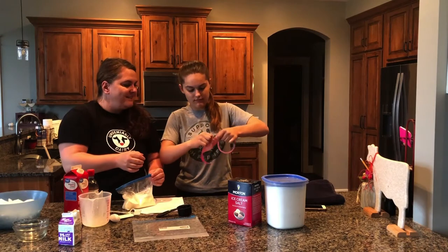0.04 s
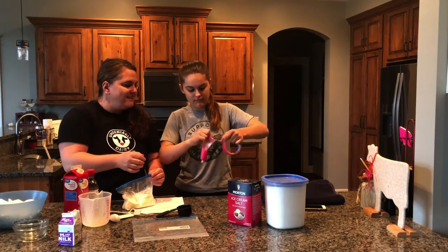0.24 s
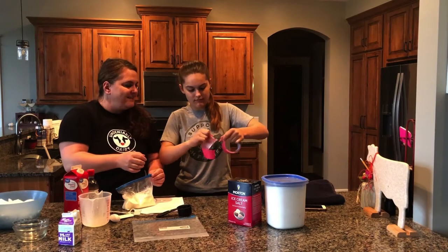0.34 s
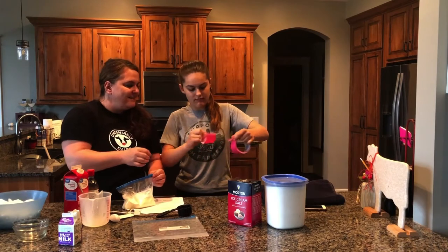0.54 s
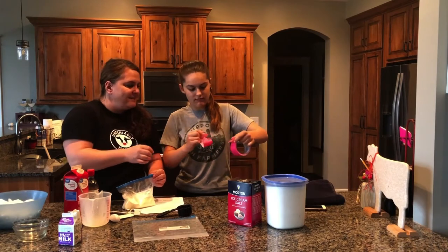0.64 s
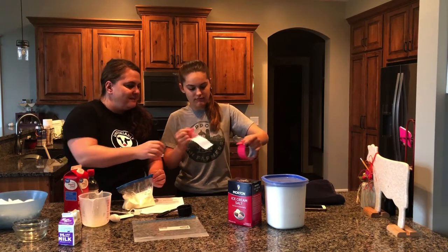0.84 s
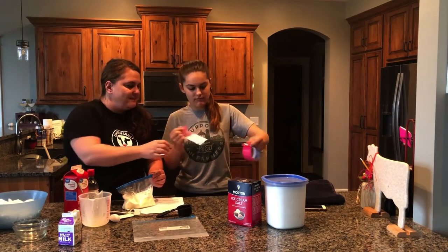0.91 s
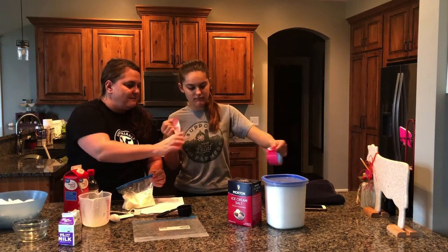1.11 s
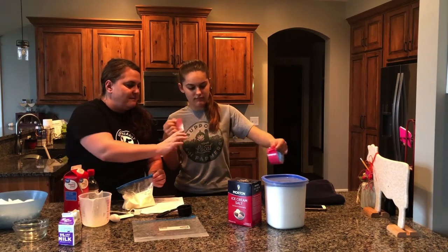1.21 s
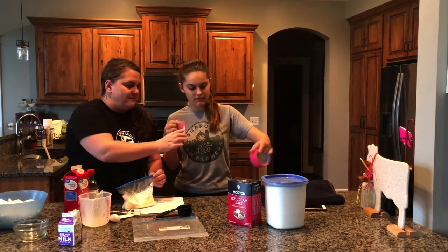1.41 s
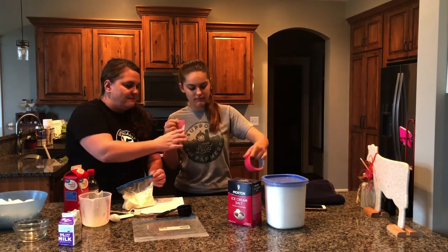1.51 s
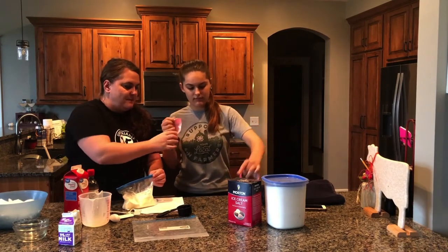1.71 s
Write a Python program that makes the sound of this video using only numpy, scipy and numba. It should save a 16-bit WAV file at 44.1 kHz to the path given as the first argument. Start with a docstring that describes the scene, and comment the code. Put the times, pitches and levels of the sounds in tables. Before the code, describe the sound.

One loud, very short tape rip with dull low knocks rings through a hard-surfaced kitchen, followed by light ticks, jerky rubbing and a last sticky click, heard from some distance over quiet room noise.

```python
"""A strip of duct tape is torn off its roll in a hard-surfaced kitchen, a few metres from the microphone.
The glue lets go in quick slips, each a spray of fibre breaks that rings the free strip. Low knocks begin
during the tear and go on after it; the strip crackles in short noise bursts, is rubbed in jerks of friction
grains, and a last patch of glue snaps free as one push and pull. Early echoes and a long noise tail are the
kitchen; under it lie room noise, wavering hum, faint tones that come and go and a motor note that sets in."""
import sys
import numpy as np
from scipy import signal
from scipy.fft import rfft, irfft
from scipy.io import wavfile
from scipy.ndimage import uniform_filter1d
from numba import njit

SR = 44100
rng = np.random.default_rng(int(sys.argv[2]) if len(sys.argv) > 2 else 0)


def dump_mix(stems):
    """Bounce the given channels to the path in sys.argv[1] as a 16-bit WAV at rate SR."""
    frames = np.atleast_2d(stems).T  # one column per channel
    limited = np.clip(frames, -1, 1)  # hard clip at full scale
    pcm = np.round(limited * 32767).astype(np.int16)
    wavfile.write(sys.argv[1], SR, pcm)


def voltage_ratio(level):
    """Linear amplitude factor for a level in decibels (scalar or array-like)."""
    return 10 ** (np.asarray(level, float) / 20)


N = 77175  # samples in the scene


def level(x, db):
    """Scale to an rms level."""
    return x * voltage_ratio(db) / np.sqrt(np.mean(x ** 2))


def on_log(table, hz):
    """Read a (Hz, value) table on a log-frequency axis."""
    table = np.array(table, float)
    return np.interp(np.log(hz + 1), np.log(table[:, 0]), table[:, 1])


def colour(x, table):
    """Filter by a (Hz, dB) spectrum."""
    hz = np.arange(len(x) // 2 + 1) * SR / len(x)
    return irfft(rfft(x) * voltage_ratio(on_log(table, hz)), len(x))


@njit
def svf(x, hz, width):
    """State-variable band-pass whose centre and width may move; gain 1 at the centre."""
    y, b, l = np.empty(len(x)), 0., 0.
    for i in range(len(x)):
        g, k = np.tan(np.pi * hz[i] / SR), width[i] / hz[i]
        v = (b + g * (x[i] - l)) / (1 + g * (g + k))
        b, l, y[i] = 2 * v - b, l + 2 * g * v, k * v
    return y


def band(x, hz, width_hz):
    """Band-pass for plain numbers or curves."""
    one = np.ones(len(x))
    return svf(x + 1e-18, np.clip(hz * one, 20, .44 * SR), width_hz * one)


def grains(shape, scatter_db):
    """Noise whose samples differ widely in size, like many tiny breaks."""
    return rng.standard_normal(shape) * voltage_ratio(scatter_db * np.minimum(rng.exponential(size=shape), 4))


def add(out, s, x):
    """Mix x into out at time s."""
    i = int(s * SR)
    out[i:i + len(x)] += x[:N - i]


def burst_rms(x, length):
    """Root of the burst's energy spread over its decay length in seconds."""
    return np.sqrt(np.sum(x ** 2) / (length * SR))


def walk(rate):
    """Random levels held 1 / rate s and slewed."""
    hold = int(SR / rate)
    steps = np.repeat(rng.standard_normal(N // hold + 1), hold)
    return uniform_filter1d(steps, hold)[:N]


def curve(rows):
    """Gain over time from (s, dB) rows, silent outside."""
    rows = np.array(rows, float)
    return voltage_ratio(np.interp(np.arange(N) / SR, rows[:, 0], rows[:, 1], left=-150, right=-150))


def floor():
    """Coloured room noise, sines of wavering hum, narrow-band noise tones and a steady motor sine."""
    # spectrum of the room noise: f/Hz, relative level/dB
    room_noise = [(15, -47), (25, -22), (48, -0.5), (90, -7), (177, -3.5), (321, -3), (368, -2), (568, -13),
                  (617, -10), (1510, -22), (1930, -19), (13600, -34.5), (16500, -40)]
    # appliance hum: f/Hz, rms level/dB before wavering
    hum_lines = [(59.5, -76), (120, -80.5), (181, -84), (362, -79.5)]
    # faint tones: from t/s, to t/s, level/dB, f/Hz, width/Hz
    faint_tones = [(0.014, 0.22, -73.5, 1480, 60), (.65, .85, -67, 1483, 57)]
    t = np.arange(N) / SR
    out = level(colour(rng.standard_normal(N), room_noise), -67)
    for hz, db in hum_lines:
        waver = voltage_ratio(db + 2.0 * walk(9.2))
        out += np.sqrt(2) * waver * np.sin(2 * np.pi * (hz * t + rng.random()))
    motor_from_s, motor_hz, motor_db = 1.0, 473.7, -76
    motor_fade = np.clip((t - motor_from_s) / .05, 0, 1)
    out += np.sqrt(2) * voltage_ratio(motor_db) * motor_fade * np.sin(2 * np.pi * motor_hz * t)
    for start, end, db, hz, width in faint_tones:
        fade = np.clip(np.minimum(t - start, end - t) / 0.011, 0, 1)
        out += fade * level(band(rng.standard_normal(N), hz, width), db)
    return out


def tear():
    """Each slip is a short spray of breaking fibres that rings the free strip."""
    # slips of the tear: t/s, relative level/dB, decay length/s, ring of the free strip f/Hz
    slips = [(0.199, -36, 0.0008, 3260), (0.1995, -31.5, 0.0013, 2440), (0.2037, -22.5, 0.00074, 2480),
             (0.2112, -17.5, 0.00083, 2580), (0.2138, -14, 0.001, 2360), (0.2169, -13, 0.00086, 2360),
             (0.2198, -18.5, 0.0013, 2830), (0.2241, -20.5, 0.00085, 3800), (0.2261, -18, 0.0011, 4000),
             (0.2307, -12, 0.00059, 4070), (0.233, -16, 0.00078, 4080), (0.2349, -20, 0.0009, 3800),
             (0.2382, -13.5, 0.0011, 3748), (0.2407, -18, 0.00054, 4330), (0.2431, -10, 0.00068, 5230),
             (0.2433, -12, 0.00045, 3900), (0.2462, -11.5, 0.0009, 4400), (0.248, -10, 0.001, 3310),
             (0.2504, -18.5, 0.0009, 3960), (0.2604, -15, 0.00082, 3380), (0.2616, -12, 0.00096, 4000),
             (0.2701, -16.5, 0.001, 4290), (0.2737, -10.5, 0.00074, 2990), (0.283, -28.5, 0.0009, 4300)]
    # colour of the whole tear: f/Hz, relative level/dB
    tear_colour = [(88, -54), (150, -25.5), (549, -10.5), (898, -22), (1210, -13.5), (1720, -10.5),
                   (2870, -7), (7510, -1.5), (8620, -4), (15300, -4.5), (16500, -20)]
    # fixed treble rings: f/Hz, width/Hz, relative level/dB (doubled in amplitude below)
    treble_rings = [(8860, 1000, -8), (13400, 870, -14)]
    strip_width_hz = 910
    out, t = np.zeros(N), np.arange(1024) / SR
    sprays = grains((len(slips), 1024), 2.5)
    for (s, db, length, hz), spray in zip(slips, sprays):
        x = spray * np.minimum(t / 0.00031, 1) * np.exp(-t / length)
        x = x + voltage_ratio(5) * (t == 0)  # first break, standing over the spray
        strip = voltage_ratio(3.5) * 2 * band(band(x, hz, strip_width_hz), hz, 2 * strip_width_hz)
        treble = sum(voltage_ratio(d) * 2 * band(x, f, w) for f, w, d in treble_rings)
        x = x + strip + treble
        add(out, s, x * voltage_ratio(db) / burst_rms(x, length) / 2)
    coloured = colour(out, tear_colour)
    return coloured * np.std(out) / np.std(coloured)  # colouring leaves the overall level alone


def rub():
    """Each jerk is a spray of friction grains ringing the strip; the hands rumble under it."""
    # jerks of fingers on the strip: t/s, level/dB before halving, resonance f/Hz, decay length/s
    jerks = [(0.766, -49, 6760, 0.0055), (0.7886, -51, 7450, 0.0036), (0.7907, -48.5, 7860, 0.0066),
             (0.8104, -50.5, 8320, 0.0087), (0.835, -46, 7900, 0.0045), (0.848, -51, 7900, 0.0043),
             (0.8563, -47.5, 7630, 0.0034), (0.8714, -45, 7290, 0.0038), (0.8895, -48, 7250, 0.0024),
             (0.893, -56, 6870, 0.003), (0.91, -40.5, 7620, 0.0017), (0.9258, -48.5, 7330, 0.0024),
             (0.9384, -48.5, 6100, 0.003), (0.9523, -43.5, 5500, 0.002), (0.9725, -55, 5100, 0.0037),
             (0.9886, -50, 5500, 0.0033), (0.994, -51.5, 5390, 0.0024)]
    # dull handling rumble: t/s, level/dB before wavering
    handling = [(.2, -85), (.25, -59), (.35, -63), (.47, -62), (.55, -76), (.7, -82), (.8, -73), (.92, -69),
                (1.0, -77), (1.1, -92)]
    out, t = np.zeros(N), np.arange(2048) / SR
    sprays = grains((len(jerks), 2048), 1.5)
    for (s, db, hz, length), spray in zip(jerks, sprays):
        x = spray * np.minimum(t / .0015, 1) * np.exp(-t / length)
        over_hz = 1.73 * hz
        resonance = band(band(x, hz, 0.19 * hz), hz, 0.89 * hz)
        overtone = voltage_ratio(-10.5) * band(x, over_hz, 0.24 * over_hz)
        body = voltage_ratio(-7) * band(x, 4340, 4700)
        x = resonance + overtone + body
        add(out, s, x * voltage_ratio(db) / burst_rms(x, length) / 2)
    waver = voltage_ratio(3.4 * walk(39.8))
    rumble = level(band(rng.standard_normal(N), 400, 327), 0)
    return out + curve(handling) * waver * rumble


def near_walls(x):
    """A few early echoes, each scattered in its own way by uneven surfaces."""
    # counter and cabinets: delay t/s, level/dB
    early_echoes = [(.002, -9.5), (.0035, -13.5), (.0045, -21), (.0125, -17.5), (.0142, -12.5),
                    (.0175, -14.5), (.031, -18)]
    smear_s = 0.00085
    out = np.zeros(N)
    fade = np.exp(-np.arange(128) / SR / smear_s)
    smears = rng.standard_normal((len(early_echoes), 128)) * fade
    for (s, db), smear in zip(early_echoes, smears):
        add(out, s, voltage_ratio(db) * smear / np.sqrt(np.sum(smear ** 2)))
    return x + signal.fftconvolve(x, out)[:N]


def kitchen(x):
    """Dense echoes that build up after a short gap and die at their own rate in every band."""
    # time for the kitchen to die by 60 dB: f/Hz, t60/s
    decay_times = [(200, 0.46), (500, 0.9), (1400, 1.127), (3700, 0.89), (7000, 0.75), (11000, 0.37),
                   (16000, 0.64)]
    # strength of the reverberation: f/Hz, relative level/dB
    tail_colour = [(200, 7), (600, 4.5), (1500, 6), (3000, -2.5), (4500, 2), (6000, 2.5), (9000, -2.5),
                   (16000, -2.5)]
    gap_s, build_s = 0.0036, 0.0097
    t, tail = np.arange(N) / SR, 0
    for hz in 100 * 2 ** np.arange(0, 7.6, .5):  # half-octave steps
        noise = band(band(rng.standard_normal(N), hz, hz / 2), hz, hz / 2)
        tail = tail + noise * voltage_ratio(on_log(tail_colour, hz) - 60 * t / on_log(decay_times, hz))
    tail = tail * np.clip((t - gap_s) / build_s, 0, 1)
    return signal.fftconvolve(x, tail / np.sqrt(np.sum(tail ** 2)))[:N]


def knocks():
    """Soft, low, quickly damped sines: blows of the roll against the hand."""
    # t/s, level/dB before onset and damping, f/Hz, t60/s
    blows = [(.262, -42.5, 520, .05), (.288, -37.5, 319, 0.046), (0.449, -64, 425, .08),
             (.51, -63, 590, 0.023)]
    out, t = np.zeros(N), np.arange(8192) / SR
    for s, db, hz, t60 in blows:
        envelope = (1 - np.exp(-t / 0.001)) * np.exp(-np.log(1000) * t / t60)
        add(out, s, voltage_ratio(db) * np.sin(2 * np.pi * hz * t) * envelope)
    return out


def ticks():
    """The loose strip gives single short cracks of noise, with a fine random crackle as well."""
    # single crackles: t/s, level/dB, centre f/Hz, decay length/s
    cracks = [(.447, -46, 12700, 0.00089), (.457, -50, 12000, 0.0007), (.470, -45.5, 12100, 0.00073),
              (.490, -47.5, 11500, 0.0012), (.501, -57, 11000, .001), (.519, -54, 11000, .001),
              (.538, -49, 13000, 0.0013), (.575, -55, 11000, 0.00071), (.607, -47, 11500, 0.0011),
              (.620, -56, 13000, 0.00091), (.653, -47, 10000, .0007), (.686, -63, 11000, .001),
              (.722, -54, 11000, 0.0011), (1.2255, -73, 8900, .001), (1.2985, -56, 2390, 0.00094),
              (1.309, -60, 2690, .0015), (1.725, -57.5, 10210, 0.0012), (1.739, -64, 6000, 0.0012)]
    # fine crackle: t/s, level/dB
    fine_levels = [(.3, -47), (.5, -70), (.72, -72), (.85, -67), (1.0, -68.5), (1.05, -88)]
    out, t = np.zeros(N), np.arange(1024) / SR
    sprays = rng.standard_normal((len(cracks), 1024))
    for (s, db, hz, length), spray in zip(cracks, sprays):
        x = spray * np.exp(-t / length)
        width_hz = .75 * hz
        x = band(band(x, hz, width_hz), hz, width_hz) + voltage_ratio(-10.5) * band(x, 6050, 9000)
        add(out, s, x * voltage_ratio(db) / burst_rms(x, length))
    per_s, fine_hz, fine_width_hz = 2300, 11000, 9000
    fine = grains(N, 3.4) * (rng.random(N) < per_s / SR)
    fine = band(band(fine, fine_hz, fine_width_hz), fine_hz, fine_width_hz)
    return out + curve(fine_levels) * level(fine, 0)


def snap():
    """The last patch of glue lets go: one push and pull, then a short ring of the strip."""
    # spectrum of the snap: f/Hz, relative level/dB
    snap_colour = [(410, -27), (900, -16.5), (1680, -15), (2160, -9.5), (3200, -9.5), (5250, -2.5),
                   (6500, -6), (8760, -1.5), (12000, -5), (15500, -8), (17000, -17)]
    snap_s, peak_db, ring_hz, ring_width_hz = 1.3703, -23, 5300, 900
    out, t = np.zeros(N), np.arange(1024) / SR
    middle_s = t[len(t) // 2]
    click = colour(1. * (t == middle_s), snap_colour)
    x = signal.hilbert(click).imag  # a quarter turn makes the click a push and pull
    x = x + voltage_ratio(3) * band(x, ring_hz, ring_width_hz)
    add(out, snap_s - middle_s, voltage_ratio(peak_db) * x / np.abs(x).max())
    return out


def scene():
    """Direct sound with early echoes, the kitchen's answer and the floor."""
    rip, low, small, last = tear(), knocks(), ticks() + rub(), snap()
    to_kitchen = voltage_ratio(-3.5) * rip + voltage_ratio(-12.5) * low + voltage_ratio(-.8) * small + voltage_ratio(-1.5) * last
    tail = kitchen(to_kitchen)
    return (near_walls(rip + low + small + last) + tail + floor())[None]


def low_pass(x):
    """Removes everything above the highest recorded frequency."""
    return signal.sosfilt(signal.butter(12, 16990, fs=SR, output="sos"), x)


def record(dry):
    """A steep elliptic low-pass cuts the top."""
    top_hz, ripple_db, stop_db = 16050, .3, 40
    top_cut = signal.ellip(8, ripple_db, stop_db, top_hz, fs=SR, output="sos")
    mix = signal.sosfilt(top_cut, dry)
    return low_pass(mix)


dry = scene()
out = record(dry)
dump_mix(out)
```